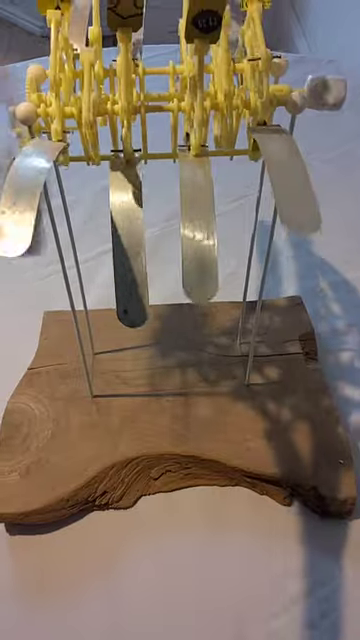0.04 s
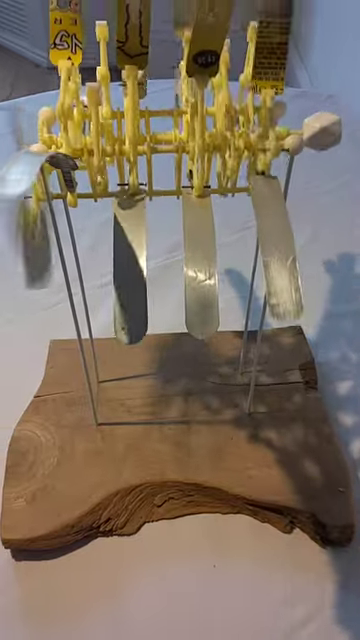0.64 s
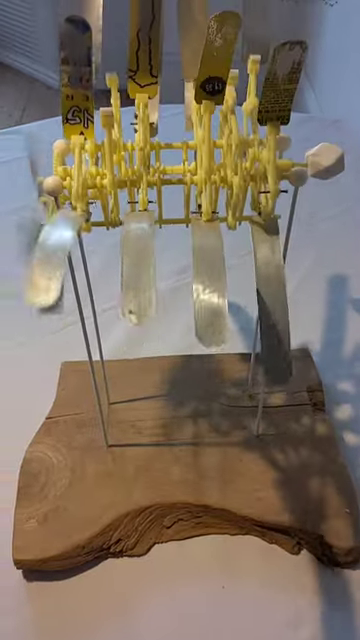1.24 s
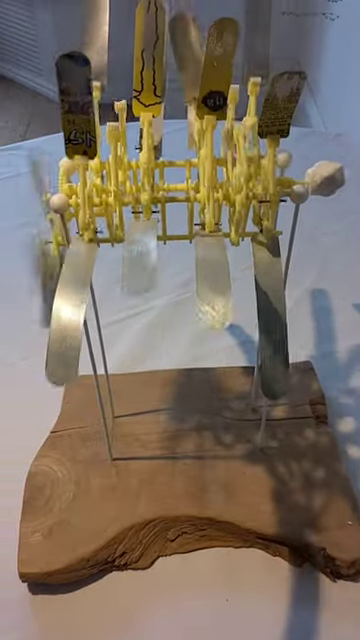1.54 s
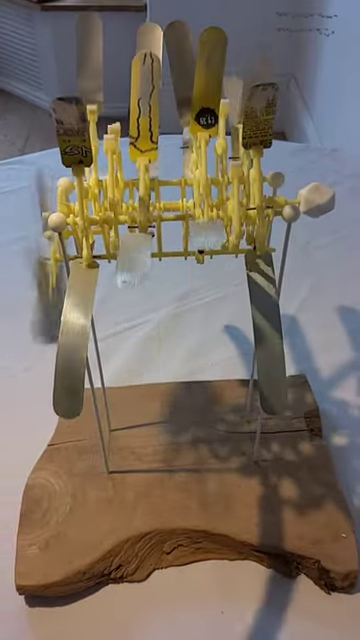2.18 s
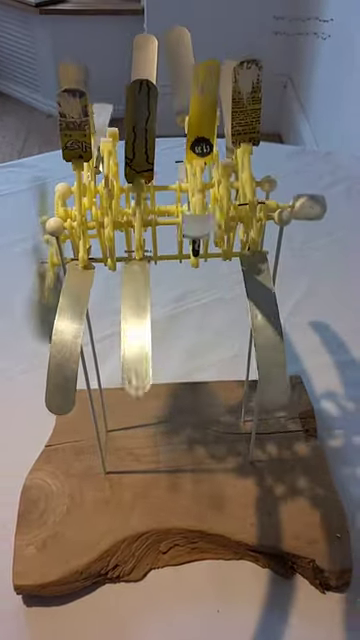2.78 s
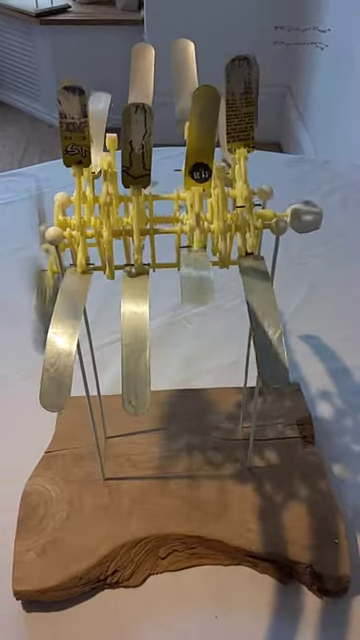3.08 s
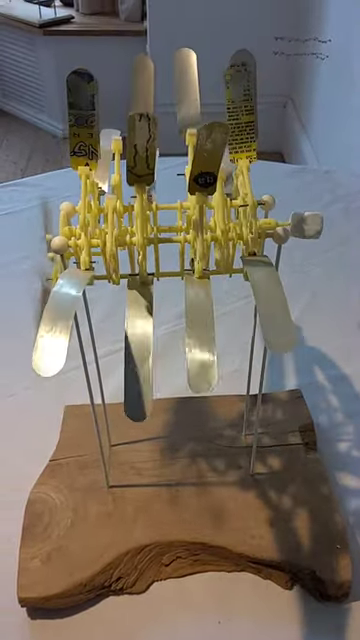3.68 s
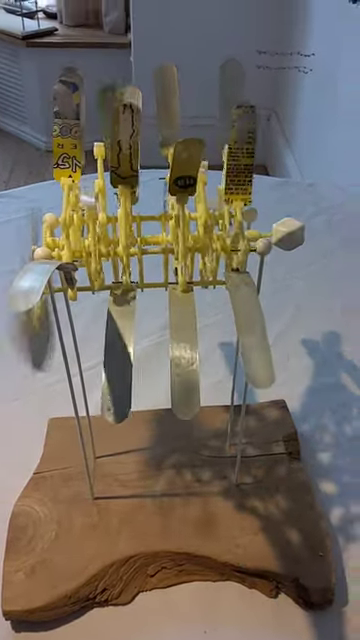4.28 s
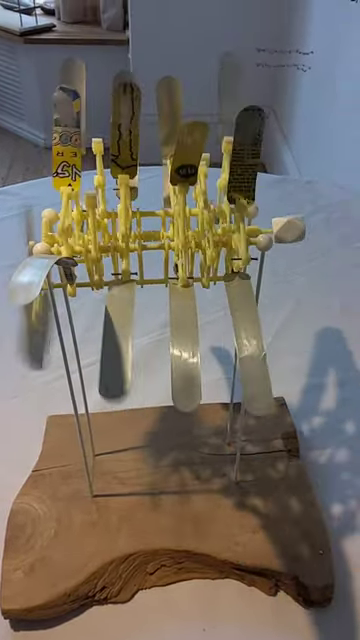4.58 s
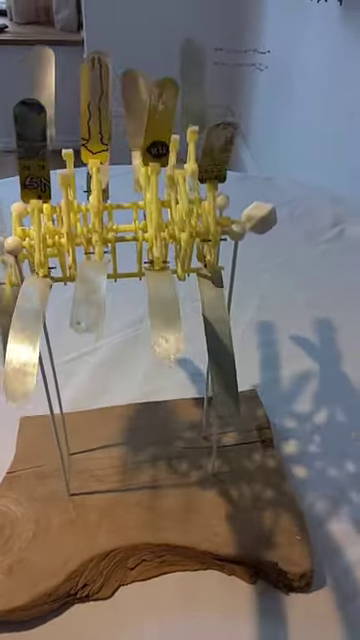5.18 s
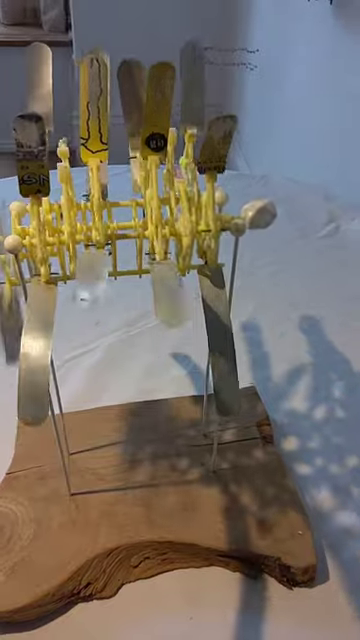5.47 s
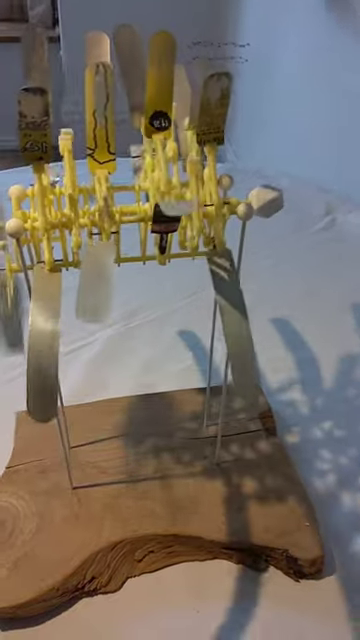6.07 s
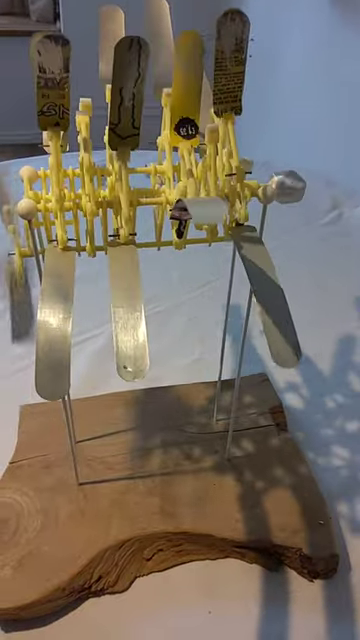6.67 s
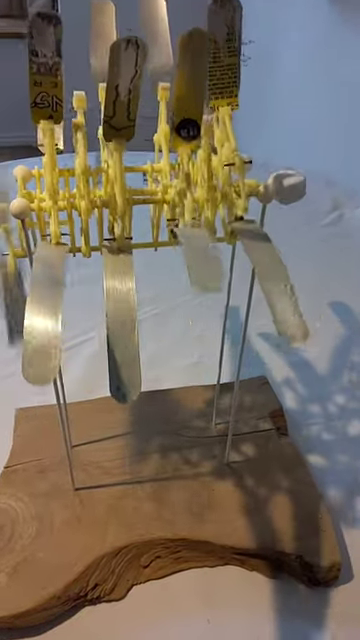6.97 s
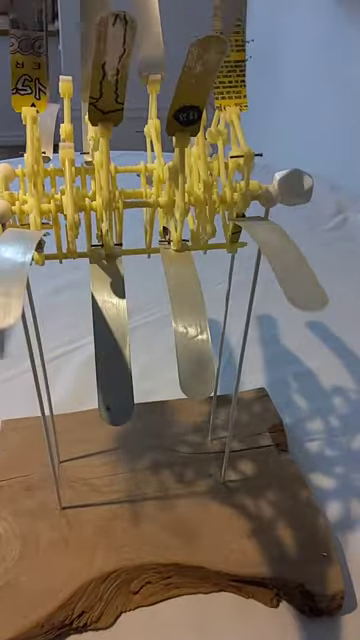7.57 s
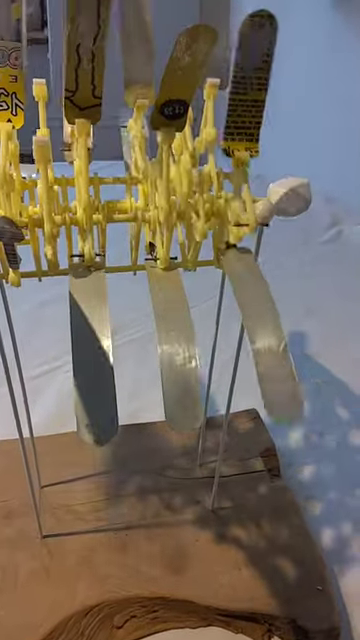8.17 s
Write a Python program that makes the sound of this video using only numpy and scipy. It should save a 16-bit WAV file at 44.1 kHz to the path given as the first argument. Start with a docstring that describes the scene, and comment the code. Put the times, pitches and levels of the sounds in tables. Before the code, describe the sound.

Close to the microphone in a small room, a plastic linkage turns with a steady stream of dry ticks and rattling, broken by brighter, irregular clacks from its joints. Thin metal blades add brief, faint high rings, and a pin squeaks twice, very briefly, in the second half. A low thrum and soft knocking from the stand and frame continue beneath the clicking from start to finish.

```python
"""A small room, a hand-held microphone close to a wooden board. On a wire stand fixed to the board,
a printed plastic walking linkage turns. Loose joints clack as the crank tips each leg over; between
the clacks the pins tick, rub and twice squeak. Thin metal blades ring, and the frame knocks and rubs.
The stand thrums low under the drive, over a steady hum; board and walls throw the clicks back."""
import sys
import numpy as np
from scipy import signal
from scipy.fft import rfft, irfft
from scipy.io import wavfile
from scipy.ndimage import uniform_filter1d

SR = 44100
rng = np.random.default_rng(int(sys.argv[2]) if len(sys.argv) > 2 else 0)


def pcm_store(signal):
    """Save signal as 16-bit PCM."""
    levels = np.round(np.clip(np.atleast_2d(signal), -1, 1) * 32767)
    wavfile.write(sys.argv[1], SR, levels.astype(np.int16).T)


N = 367794

# The steady hum. Each row: pitch in Hz, level in dB.
HUM_TONES = [(200, -82.5), (264, -80.5)]
# Faint tones that swell and fade. Each row: centre and half length in seconds, pitch in Hz, level in dB.
PASSING_TONES = [(0.05, .55, 191, -66), (3.3, 1.0, 265, -77)]
# The wire stand swaying on its board. Each row: frequency in Hz, width in Hz, level in dB.
STAND_MODES = [(73.7, 20, -12.5), (99.96, 6.7, 0), (106.2, 8.9, -2), (130.8, 5.1, -6.5)]
# Load on the drive as the legs go over. Each row: time in seconds, stand thrum in dB, frame knock in dB.
DRIVE_LOAD = [(0, -64, -51.5), (0.25, -54, -62), (0.55, -59.5, -63), (1.05, -54.5, -62.5), (1.7, -56, -63),
              (2.35, -54, -63.5), (3.15, -63.5, -66), (3.6, -58, -63.5), (3.85, -57, -64),
              (4.15, -59, -65.5), (5.15, -58.5, -64.5), (5.5, -55, -63.5), (5.8, -58, -64.5),
              (6.3, -54.5, -61), (6.65, -56, -65.5), (7.3, -54.5, -62), (7.75, -62, -65),
              (8.33, -51.5, -59)]
# Brief swells of the thrum. Each row: centre in seconds, level in dB, half length in seconds.
THRUM_SWELLS = [(0.016, -44, 0.028), (0.139, -46, 0.022), (0.625, -50, 0.026), (1.047, -50, 0.027),
                (1.883, -45.5, 0.032), (2.014, -47, 0.014), (2.31, -46, 0.052), (2.723, -51, 0.06),
                (3.53, -45.5, 0.019), (3.774, -48, 0.026), (3.894, -48, 0.03), (5.517, -40.5, 0.028),
                (6.014, -52, 0.036), (6.314, -43, 0.013), (7.968, -48, 0.063)]
# The body of frame and board. Each row: frequency in Hz, gain in dB.
FRAME_COLOUR = [(25, -25), (55, -3), (90, 0), (175, 6.5), (235, -2), (275, 5), (310, 0), (345, 8.5),
                (400, 0), (520, 4.5), (700, -2.5), (1000, -5.5), (1400, -9.5), (2500, -23)]
# Speed of the drive. Each row: time in seconds, gear teeth per second.
TOOTH_RATE = [(0, 36.5), (0.8, 38), (1.5, 36), (2.5, 38.5), (3.1, 35.5), (4.7, 39.5), (5.3, 37),
              (6.0, 38.5), (6.6, 36), (7.3, 39.5), (8.1, 35.5)]
# How hard the pins rub between clacks. Each row: time in seconds, level in dB.
PIN_FRICTION = [(0.0, -31.5), (0.4, -45.5), (0.6, -43), (2.23, -36), (2.86, -42.5), (3.23, -40),
                (3.97, -42.5), (5.71, -40), (5.87, -43.5), (6.41, -38), (6.62, -48.5), (7.15, -39.5),
                (7.27, -37), (7.46, -44.5), (8.34, -40.5)]
# Ringing of the plastic links. Each row: frequency in Hz, width in Hz, gain in dB.
LINK_MODES = [(1735, 50, -1), (2005, 40, -1), (2215, 70, -4), (3340, 60, -6), (3980, 90, -6),
              (4590, 70, -6), (4890, 120, -5), (5320, 70, -10), (6520, 80, -4), (6750, 70, -3),
              (7020, 80, -7), (7845, 90, -3), (9025, 90, 0), (9220, 70, -4), (11030, 150, 1),
              (11260, 120, -3)]
# The longer ring of the thin metal blades. Each row: frequency in Hz, width in Hz, gain in dB.
BLADE_MODES = [(3110, 45, -4), (4790, 25, -4), (4865, 25, -2), (4930, 35, -1), (7610, 60, -12),
               (7840, 70, -10), (9035, 70, -10)]
# A joint takes up its slack. Each row: start in seconds, level in dB, treble tilt in dB, joint letter.
CLACKS = [(0.0226, -19, 5, "b"), (0.1356, -24, 6, "e"), (0.1847, -21, 0, "d"), (0.2723, -34, 11, "d"),
          (0.439, -30, -5, "d"), (0.4618, -19.5, 2, "d"), (0.5686, -24, -3, "f"), (0.605, -36.5, -17, "g"),
          (0.6843, -37, 7, "a"), (0.718, -35, -15, "a"), (0.7445, -35, -8, "c"), (0.852, -32.5, -3, "h"),
          (0.871, -44, -16, "a"), (0.9496, -32, 2, "a"), (0.987, -33, -12, "h"), (1.0066, -19, 7.5, "h"),
          (1.0116, -19.5, 5, "h"), (1.04, -39, -4, "d"), (1.1463, -36.5, 9, "c"), (1.2545, -26, -1, "d"),
          (1.2803, -28.5, -5, "d"), (1.3853, -22.5, -3.5, "f"), (1.5305, -18, 4, "b"),
          (1.6665, -21, -3.5, "c"), (1.8055, -24.5, 7, "c"), (1.922, -25.5, 8, "e"),
          (1.9698, -20, 7.5, "d"), (2.0785, -25, -1, "f"), (2.2147, -16, 6, "d"), (2.317, -21.5, 4, "g"),
          (2.3409, -24, 10, "e"), (2.4803, -33, 2, "a"), (2.7498, -33, 3, "d"), (2.774, -30.5, 5, "d"),
          (2.883, -26.5, -2.5, "f"), (3.03, -20.5, 6.5, "b"), (3.1637, -25, -1, "g"),
          (3.3065, -18.5, 4, "b"), (3.4197, -23, 6, "g"), (3.445, -37, -12, "g"), (3.496, -33.5, -10, "g"),
          (3.7025, -29, 0, "e"), (3.7549, -22.5, -1.5, "a"), (3.8683, -27.5, 3, "e"), (4.129, -25, 4, "e"),
          (4.1782, -25.5, 3, "a"), (4.2949, -27, 2.5, "f"), (4.321, -42, -17, "f"), (4.4007, -35, -10, "a"),
          (4.4297, -36.5, -15, "d"), (4.577, -26.5, 3, "g"), (4.6927, -35.5, 12, "d"),
          (4.8214, -34, 7, "d"), (4.8795, -23, 4, "h"), (4.882, -19, 7, "h"), (4.996, -24.5, 0, "f"),
          (5.2737, -29.5, -2, "c"), (5.296, -30.5, -11, "d"), (5.3488, -36, -5, "a"),
          (5.414, -26.5, -3, "c"), (5.4942, -33, 12, "g"), (5.5562, -16.5, 3.5, "c"),
          (5.7004, -24.5, 0, "c"), (5.8102, -30.5, -1, "g"), (5.834, -30.5, 12, "g"),
          (6.124, -36, -11, "d"), (6.2205, -29, -1, "e"), (6.2671, -26, -3, "a"), (6.289, -33, 9, "a"),
          (6.3131, -38, 10, "a"), (6.3546, -23, 4.5, "e"), (6.404, -25, 5, "a"), (6.52, -26.5, 0, "e"),
          (6.557, -45, -8, "e"), (6.6648, -28.5, 4, "d"), (6.779, -29, 2, "e"), (6.828, -27, -5, "c"),
          (7.1032, -24.5, -3, "a"), (7.1487, -37, 10, "a"), (7.188, -21.5, 4, "g"), (7.2404, -27, -8, "a"),
          (7.3471, -21.5, 2, "e"), (7.5228, -34.5, 2, "g"), (7.6026, -36.5, 11, "c"),
          (7.639, -20, 2.5, "b"), (7.7515, -28.5, 1, "e"), (7.9146, -34, -2, "a"), (7.9728, -34, 5, "d"),
          (8.0356, -37.5, -17, "c"), (8.0587, -35, -9, "c"), (8.0845, -35, -13, "d"),
          (8.114, -34.5, -1, "a")]
# Hollow ring of the links at each joint, by letter. Each row: frequency in Hz, width in Hz, gain in dB.
JOINT_MODES = { "a": [(3095, 70, -1), (4090, 170, -5), (4835, 100, 8), (5460, 150, -4), (6050, 60, -3),
               (6710, 100, -10), (7845, 110, 6), (8190, 280, -4), (8470, 60, 4), (8990, 60, 0),
               (10380, 100, -1), (10930, 60, 2), (11625, 150, -6)], "b": [(1720, 100, 0), (2000, 90, 0),
               (3290, 180, -2), (4185, 350, -7), (4815, 140, 2), (5310, 60, -3), (5710, 100, 2),
               (6125, 90, 0), (6655, 250, 5), (8320, 350, -2), (9095, 240, -2), (10055, 350, -2),
               (11055, 280, 8)], "c": [(1825, 240, -4), (3340, 190, 0), (3980, 210, -3), (4845, 110, 5),
               (5355, 60, -3), (5805, 350, -8), (6830, 350, -5), (7745, 280, -9), (8395, 100, -4),
               (9160, 350, 2), (9915, 120, -1), (11135, 350, -1), (11625, 60, 2)], "d": [(1770, 90, 5),
               (1990, 60, 1), (2220, 60, 6), (3325, 350, -1), (4850, 160, 1), (5360, 60, -4), (5680, 80, 2),
               (6060, 90, -2), (6675, 200, 2), (7945, 350, -3), (9110, 310, 2), (10450, 110, 2),
               (10985, 140, 4)], "e": [(1910, 300, 2), (2785, 60, 4), (3500, 350, 1), (4885, 250, -3),
               (5550, 140, -4), (6005, 240, -5), (7235, 140, 8), (7615, 190, -2), (9210, 60, -4),
               (9710, 270, 3), (10215, 170, 3), (11165, 150, 1), (11905, 350, 2)], "f": [(1965, 150, 1),
               (2215, 60, -1), (2775, 60, -2), (4570, 60, 2), (4990, 180, -3), (6480, 150, 0),
               (6940, 120, 3), (7255, 60, -1), (8440, 210, 2), (9045, 120, -5), (10325, 100, 6),
               (11290, 310, 2), (11910, 100, 4)], "g": [(1970, 350, 3), (2250, 130, 1), (2775, 100, 4),
               (3365, 150, -2), (3650, 80, 4), (3985, 220, -1), (4560, 60, 2), (4985, 200, 1),
               (5665, 350, -6), (6495, 100, -3), (9010, 100, -5), (10190, 60, 2), (11875, 160, 5)],
               "h": [(1900, 350, 6), (2225, 80, 8), (3325, 100, 9), (4110, 170, 1), (4790, 130, 4),
               (5360, 80, 9), (6725, 350, 4), (7645, 350, 1), (8395, 140, 0), (9045, 90, 14), (9380, 60, 7),
               (10420, 80, 3), (11155, 100, 4)]}
# Broad colour of a plastic contact. Each row: frequency in Hz, gain in dB.
PLASTIC_COLOUR = [(300, -29.5), (900, -31), (1400, -30.5), (1800, -18.5), (2650, -13), (3300, -7.5),
                  (4200, -1), (5800, -1), (7500, 0.5), (9700, -4), (10600, -6.5), (11600, -8),
                  (13000, -8.5), (15800, -17.5)]
# A blade sings out. Each row: start in seconds, pitch in Hz, level in dB, time to its peak in seconds.
BLADE_NOTES = [(0.19, 4950, -44, .04), (1.007, 9040, -48, .025), (1.03, 4920, -50, .04),
               (1.82, 3120, -53, .04), (1.97, 4800, -47, .025), (2.25, 3115, -51.5, .04),
               (2.67, 3120, -51, .02), (2.68, 4920, -55, .04), (2.795, 4890, -49, .015),
               (2.888, 4570, -45.5, .018), (3.756, 4815, -51, .008), (4.881, 9040, -51, .025),
               (5.28, 4850, -48, .035), (5.41, 4850, -50, .025), (5.558, 4860, -40, .022),
               (5.69, 4800, -43.5, .022), (6.87, 3330, -52, .045), (7.64, 4880, -48, .035)]
# A hard blow rings the frame. Each row: start in seconds, pitch in Hz, level in dB, decay in seconds.
FRAME_NOTES = [(1.01, 1735, -53, .05), (1.01, 2205, -54, .05), (4.883, 1690, -56, .05),
               (4.883, 2200, -56, .05)]
# A leg drags on the frame. Each row: centre in seconds, level in dB, half length in seconds.
LEG_DRAGS = [(1.107, -67, 0.017), (1.704, -65, .12), (2.373, -65, 0.063), (3.395, -68.5, 0.14),
             (6.25, -67, .15), (7.364, -66, .05), (7.664, -64.5, 0.022)]
# A dry pin chirps. Each row: centre in seconds, pitch in Hz, level in dB, half length in seconds.
PIN_SQUEAKS = [(5.498, 5380, -34, .009), (5.842, 5150, -42, .009)]
# The linkage with the microphone in front of it. Each row: frequency in Hz, left minus right in dB.
FRONT_BALANCE = [(1000, -2.5), (2100, -2), (3500, 0.5), (6500, -0.5), (8000, -2.5), (9300, 2.5),
                 (10400, -0.5), (11200, -5.5), (15500, -7.5)]


def undb(db):
    """Decibels to gain."""
    return 10 ** (np.asarray(db) / 20)


def unit(x):
    """Scale to rms 1."""
    return x / np.sqrt(np.mean(x ** 2))


def curve(rows, column):
    """One column of a time table, at every sample."""
    rows = np.array(rows)
    return np.interp(np.arange(N) / SR, rows[:, 0], rows[:, column])


def bump(centre_s, half_s):
    """A bell-shaped rise and fall of height 1."""
    return np.exp(-((np.arange(N) / SR - centre_s) / half_s) ** 2)


def colour(x, points, size=4096):
    """Causal filter through (Hz, dB) points on a log-frequency axis."""
    hz, db = np.array(points).T
    outline_db = np.interp(np.log(np.fft.rfftfreq(size, 1 / SR) + 1), np.log(hz), db)
    cepstrum = irfft(np.log(undb(outline_db)))
    cepstrum[1:size // 2] *= 2  # fold to minimum phase
    cepstrum[size // 2 + 1:] = 0
    impulse = irfft(np.exp(rfft(cepstrum)))
    return signal.fftconvolve(x, impulse[None], axes=1)[:, :x.shape[1]]


def ring(x, hz, width):
    """One resonance, gain 1 at its centre."""
    return signal.lfilter(*signal.iirpeak(hz, hz / width, fs=SR), x)


def steep_ring(x, hz, width):
    """The same resonance twice over, at rms 1."""
    return unit(ring(ring(x, hz, width), hz, width))


def spread(pair, side_db, pan_db):
    """Two unrelated signals as middle and side of a left-right pair."""
    left_right = np.array([[1], [-1]])
    return (pair[0] + left_right * undb(side_db) * pair[1]) * undb(left_right * pan_db / 2)


def hum():
    """A faint electric hum, and low tones that come and go, a little left of centre."""
    t = np.arange(N) / SR
    steady = sum(undb(db) * np.sin(2 * np.pi * (hz * t + rng.random())) for hz, db in HUM_TONES)
    passing = sum(undb(db) * bump(s, half) * np.sin(2 * np.pi * hz * t)
                  for s, half, hz, db in PASSING_TONES)
    return np.sqrt(2) * (steady + passing) * undb([[1.3], [-1.3]])


def stand_thrum(drive_hz=100, tone_db=-5, sway_db=-1.5, swell_hz=103):
    """The drive hums and shakes the stand, whose low modes beat against it; both follow the load."""
    t = np.arange(N) / SR
    shake = rng.standard_normal((2, N))
    modes = sum(undb(db) * steep_ring(shake, hz, width) for hz, width, db in STAND_MODES)
    sway = undb(sway_db) * unit(modes)
    thrum = sway[0] + undb(tone_db) * unit(np.sin(2 * np.pi * drive_hz * t))
    # the drive feeds the stand evenly over many cycles
    thrum = np.std(thrum) * thrum / np.sqrt(uniform_filter1d(thrum ** 2, size=9000) + 1e-9)
    load = undb(curve(DRIVE_LOAD, column=1))
    swells = sum(undb(db) * bump(s, half) * np.sin(2 * np.pi * (drive_hz * s + swell_hz * (t - s)))
                 for s, db, half in THRUM_SWELLS)
    return spread(np.array([load * thrum + swells, load * sway[1]]), side_db=-14.5, pan_db=3.5)


def contacts(per_s, scatter_db, length_s):
    """Random small contacts of uneven force, each a fading burst of noise."""
    chance, force = rng.random(N), rng.standard_normal(N)
    blows = (chance < per_s / SR) * undb(scatter_db * np.clip(force, -2, 1.6))
    energy = signal.lfilter([1], [1, -np.exp(-2 / (length_s * SR))], blows ** 2 + 1e-12)
    return unit(np.sqrt(energy) * rng.standard_normal((2, N)))


def shaking(settle_s):
    """How strongly the loose parts move: they gain energy from each clack and lose it again."""
    jolts = np.zeros(N)
    for s, db, *_ in CLACKS:
        jolts[int(s * SR)] += undb(db)
    jolts[0] += np.mean(jolts) * settle_s * SR  # already in motion
    energy = signal.lfilter([1], [1, -np.exp(-1 / (settle_s * SR))], jolts)
    return unit(np.sqrt(energy))


def frame_knocks(idle_db=-2, shaken_db=-5):
    """Dull, dense knocks pass through the frame into the board, harder after a clack."""
    mid, side = colour(contacts(per_s=240, scatter_db=-8, length_s=0.1), FRAME_COLOUR)
    # the bass is alike on both sides
    side = colour(side[None], [(30, -23), (100, -20), (250, -9), (500, -4), (1000, 2.5)])[0]
    load = undb(curve(DRIVE_LOAD, column=2))
    force = load * np.hypot(undb(idle_db), undb(shaken_db) * shaking(settle_s=0.22))
    return spread(np.array([mid, side]) / np.std(mid) * force, side_db=-4, pan_db=1)


def gear_teeth(rise_s=.003, fall_s=.006, scatter_db=1.8, between_db=-18):
    """Each gear tooth nudges the linkage with a force of its own, so the rubbing comes in pulses."""
    rate = curve(TOOTH_RATE, column=1)
    turned = np.cumsum(rate) / SR
    tooth, age = turned.astype(int), turned % 1 / rate
    force = undb(scatter_db * np.minimum(rng.standard_normal(tooth[-1] + 1), 1))
    nudges = force[tooth] * (1 - np.exp(-age / rise_s)) * np.exp(-age / fall_s)
    return unit(np.hypot(undb(between_db), nudges))


def chatter(length_s, size, rise_s=.0002, board_s=.0034, board_db=-2, right_db=-6):
    """A pin buzzes in its hole, louder on the left; the board returns it a moment later."""
    t = np.arange(size) / SR
    direct, echo = ((1 - np.exp(-age / rise_s)) * np.exp(-age / length_s)
                    for age in (t, np.maximum(t - board_s, 0)))
    envelope = np.hypot(undb([[0], [right_db]]) * direct, undb(board_db) * echo)
    return envelope * rng.standard_normal((2, size))


def pin_ticks(count=520, scatter_db=2.8, ring_db=13, width_hz=130):
    """Small dry ticks at random moments, each ringing two notes of a different short link."""
    out = np.zeros((2, N + SR))
    force = np.minimum(rng.standard_normal(count), 1)
    for (when, *pitches), blow in zip(rng.random((count, 3)), force):
        contact = chatter(length_s=.0016, size=1024)
        notes_hz = 3200 * 3.6 ** np.array(pitches)
        tick = contact + undb(ring_db) * sum(ring(contact, hz, width_hz) for hz in notes_hz)
        start = int(when * N)
        out[:, start:start + tick.shape[1]] += undb(scatter_db * blow) * unit(tick)
    return unit(out[:, :N])


def links(x, ring_db=-4, scatter_db=4, block=1024):
    """Contacts ring the links; which modes answer changes with where each blow lands."""
    strengths = rng.standard_normal((len(LINK_MODES), N // block + 1))
    out = x.copy()
    for (hz, width, db), strength in zip(LINK_MODES, strengths):
        share = undb(ring_db + db + scatter_db * np.minimum(strength, 1.5))
        out += ring(x * np.repeat(share, block)[:N], hz, width)
    return out


def blades(x):
    """The blades ring at their own modes when the linkage jolts them."""
    return sum(undb(db) * ring(x, hz, width) for hz, width, db in BLADE_MODES)


def grip(hard_db=-27.5, free_db=-4, fall_s=.016):
    """Just before a hard clack the leg falls freely through its play, and the rubbing eases."""
    free = sum(bump(s - fall_s, fall_s) for s, db, *_ in CLACKS if db > hard_db)
    return undb(free_db * np.minimum(free, 1))


def pin_rattle(gain_db=1.5, shaken_db=-44, tick_db=-3.5, hiss_db=-9, blade_db=-14):
    """Pins rub with each gear tooth, tick and hiss as they slide, harder after a clack; blades ring."""
    pulses = gear_teeth()
    grain = contacts(per_s=900, scatter_db=2, length_s=.003)
    rub_colour = [(1500, 12.5), (4300, 6.5), (7000, -12), (10000, 7.5), (14000, -4.5)]
    rub = unit(colour(grain * pulses, rub_colour))
    hiss = unit(colour(rng.standard_normal((2, N)), [(4000, -11), (9000, -0.5), (13000, -3)]))
    plastic = links(rub + undb(tick_db) * pin_ticks()) + undb(hiss_db) * hiss
    metal = blades(rng.standard_normal((2, N)) * pulses ** 2)
    friction = undb(curve(PIN_FRICTION, column=1) + gain_db)
    force = np.hypot(friction, undb(shaken_db) * shaking(settle_s=0.031))
    return (unit(plastic) + undb(blade_db) * unit(metal)) * force * grip()


def bouncing(length_s=.0045, bounce_db=-19, fade_db_per_s=70, count=4):
    """A blow and the few weak rebounds that follow while the link settles."""
    contact = chatter(length_s, size=5120)
    for delay_s in rng.uniform(.012, .075, count):
        start = int(delay_s * SR)
        rebound = undb(bounce_db - fade_db_per_s * delay_s) * chatter(length_s, size=1024)
        contact[:, start:start + 1024] += rebound
    return contact


def joint_clacks(gain_db=3, ring_db=4, blade_db=-7):
    """Each leg drops through the play in its joints; every joint rings its links at its own modes."""
    out = np.zeros((2, N + SR))
    for s, db, tilt_db, joint in CLACKS:
        contact = bouncing()
        ringing = sum(undb(ring_db + mode_db) * ring(contact, hz, width)
                      for hz, width, mode_db in JOINT_MODES[joint])
        body = np.std(contact) * unit(contact + ringing)
        hit = colour(body, [(4000, -tilt_db / 2), (11000, tilt_db / 2)], size=256)
        start = int(s * SR)
        out[:, start:start + hit.shape[1]] += undb(db + gain_db) * hit
    return (out + undb(blade_db) * blades(out))[:, :N]


def singing_blades(gain_db=-2, split_hz=38, flicker_db=3):
    """A jolted blade swells and dies on two close, beating modes; the shaking makes it flicker."""
    t = np.arange(N) / SR
    out = np.zeros((2, N))
    for s, hz, db, swell_s in BLADE_NOTES:
        sounding = (t > s) & (t < s + 10 * swell_s)
        age = t[sounding] - s
        pair = sum(np.sin(2 * np.pi * (mode_hz * age + rng.random((2, 1))))
                   for mode_hz in (hz - split_hz / 2, hz + split_hz / 2))
        envelope = age / swell_s * np.exp(1 - age / swell_s)
        out[:, sounding] += undb(db + gain_db) * envelope * pair
    flicker = unit(uniform_filter1d(rng.standard_normal(N), size=500))
    return out * unit(undb(flicker_db * flicker))


def frame_rings(width_hz=50):
    """Two hard blows leave the frame ringing briefly with hollow notes."""
    out = np.zeros((2, N))
    age = np.arange(SR // 4) / SR
    for s, hz, db, decay_s in FRAME_NOTES:
        note = steep_ring(rng.standard_normal((2, len(age))), hz, width_hz)
        start = int(s * SR)
        out[:, start:start + len(age)] += undb(db) * np.exp(-age / decay_s) * note
    return out


def leg_drags(hz=520, width_hz=230):
    """A leg drags on the frame, which answers with a hollow, grainy rub, right of centre."""
    grain = contacts(per_s=300, scatter_db=2, length_s=.004)
    force = sum(undb(db) * bump(s, half) for s, db, half in LEG_DRAGS)
    return spread(steep_ring(grain, hz, width_hz) * force, side_db=-10, pan_db=-3)


def pin_squeaks(waver_hz=130):
    """A sticking pin sings for a moment at a wavering pitch."""
    t = np.arange(N) / SR
    waver = waver_hz * unit(uniform_filter1d(rng.standard_normal((2, N)), size=64))
    drift = np.cumsum(waver, axis=1) / SR
    return sum(undb(db) * bump(s, half) * np.sin(2 * np.pi * (hz * t + drift))
               for s, hz, db, half in PIN_SQUEAKS)


def room(x, t60_low_s=0.59, t60_high_s=0.15, wet_db=-3, delay_s=0.002, build_s=0.003, positions=14):
    """A small room whose treble dies first; the reflections change as the hand-held microphone moves."""
    t = np.arange(SR // 2) / SR
    onset = 1 - np.exp(-np.maximum(t - delay_s, 0) / build_s)
    bands = [(signal.butter(2, 8000, kind, fs=SR, output="sos"), np.exp(-np.log(1000) * t / t60))
             for kind, t60 in (("low", t60_low_s), ("high", t60_high_s))]
    wet = np.zeros((2, N + len(t)))
    for part in np.array_split(np.arange(N), positions):
        tail = onset * sum(signal.sosfilt(band, rng.standard_normal((2, len(t)))) * decay
                           for band, decay in bands)
        echo = signal.fftconvolve(x[:, part], unit(tail) / np.sqrt(len(t)), axes=1)
        wet[:, part[0]:part[0] + echo.shape[1]] += echo
    return x + undb(wet_db) * wet[:, :N]


def scene():
    """The clicking linkage from close in front, over the low sounds of stand and frame."""
    clicks = colour(joint_clacks() + pin_rattle(), PLASTIC_COLOUR)
    linkage = room(clicks) + pin_squeaks() + singing_blades()
    left = colour(linkage[:1], [(hz, db / 2) for hz, db in FRONT_BALANCE])
    right = colour(linkage[1:], [(hz, -db / 2) for hz, db in FRONT_BALANCE])
    front = np.vstack([left, right])
    return front + stand_thrum() + frame_knocks() + leg_drags() + frame_rings() + hum()


def record(dry):
    """The recorder cuts the top steeply above 15.9 kHz."""
    return signal.sosfilt(signal.ellip(10, .2, 80, 15900, fs=SR, output="sos"), dry, axis=1)


dry = scene()
out = record(dry)
pcm_store(out)
```